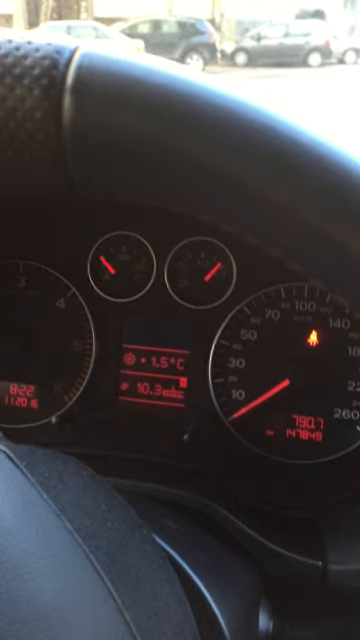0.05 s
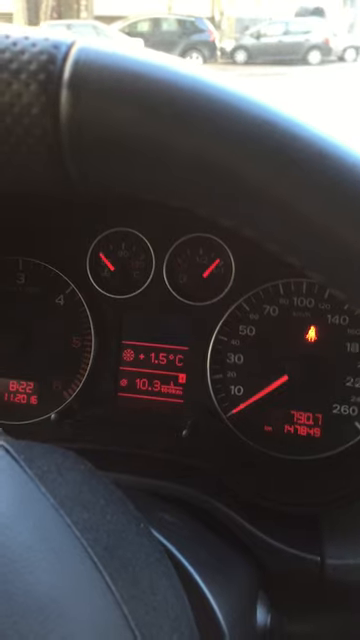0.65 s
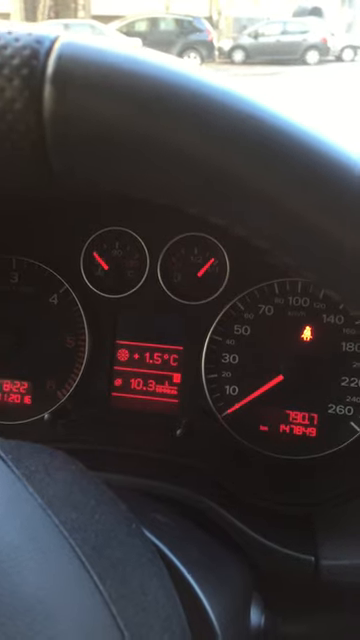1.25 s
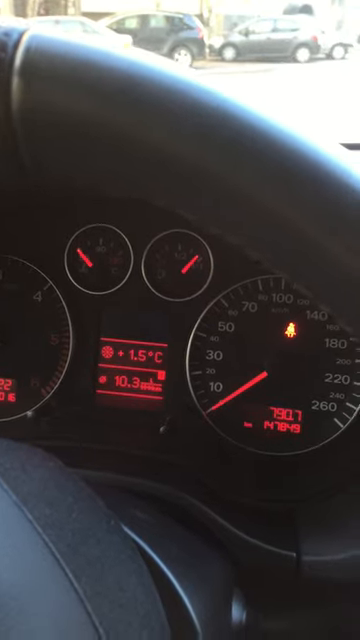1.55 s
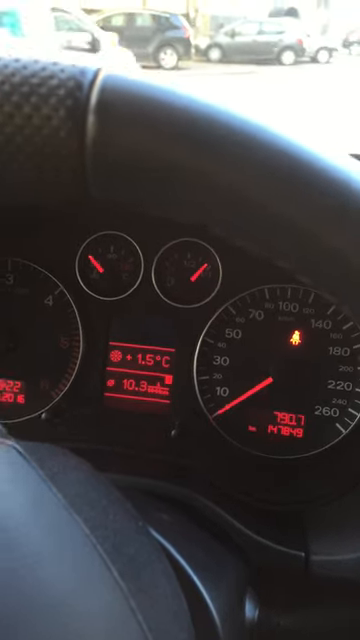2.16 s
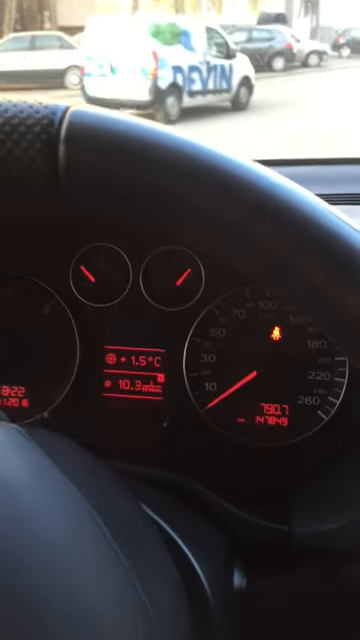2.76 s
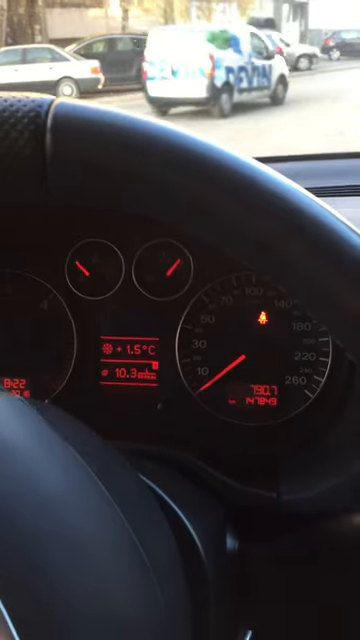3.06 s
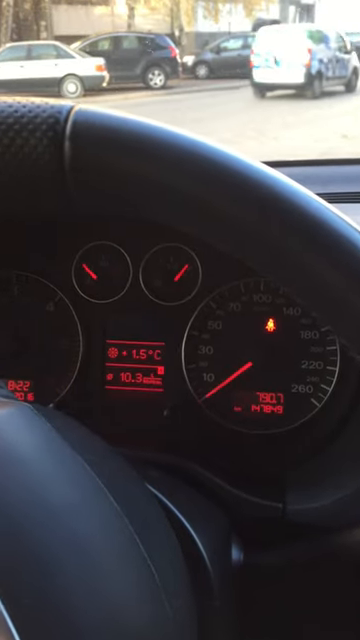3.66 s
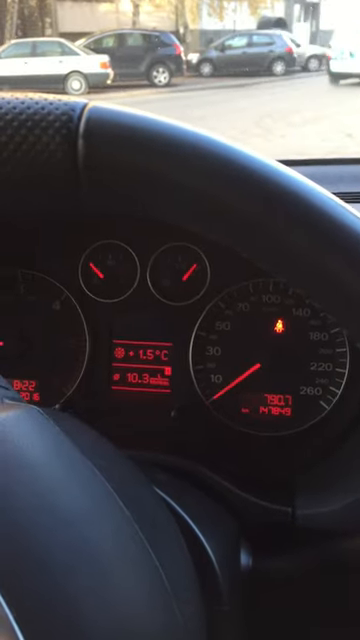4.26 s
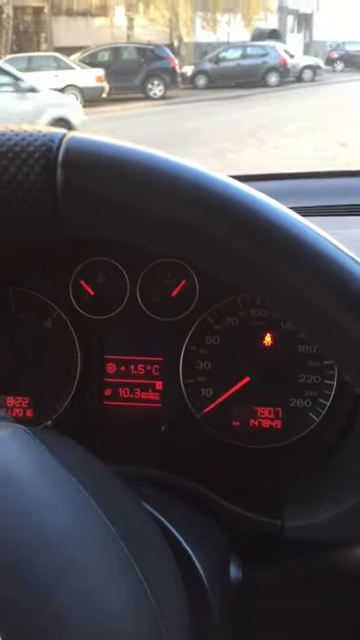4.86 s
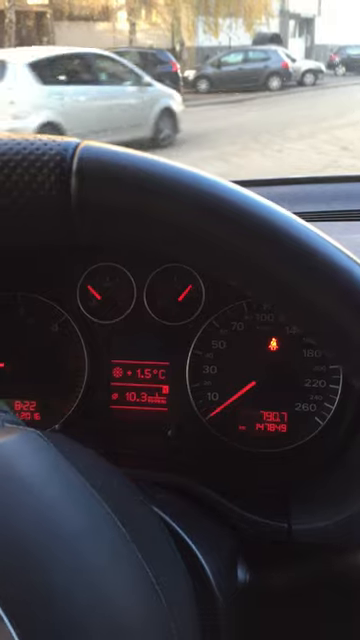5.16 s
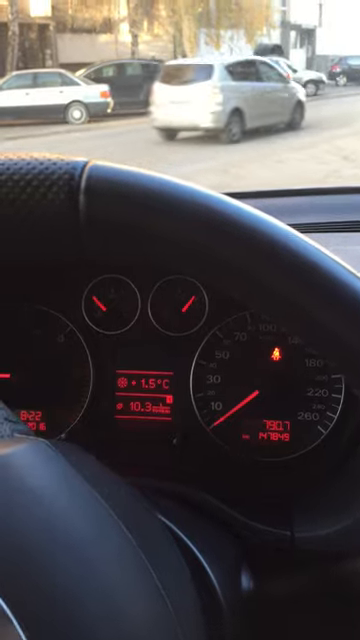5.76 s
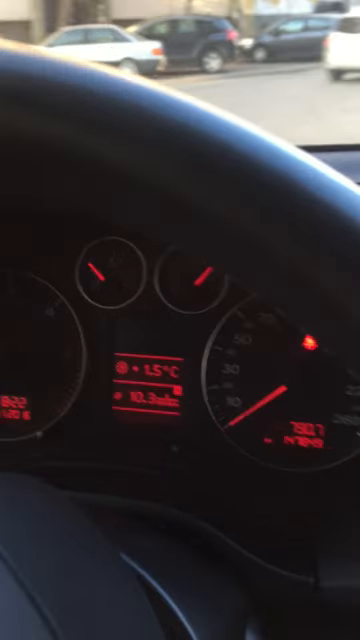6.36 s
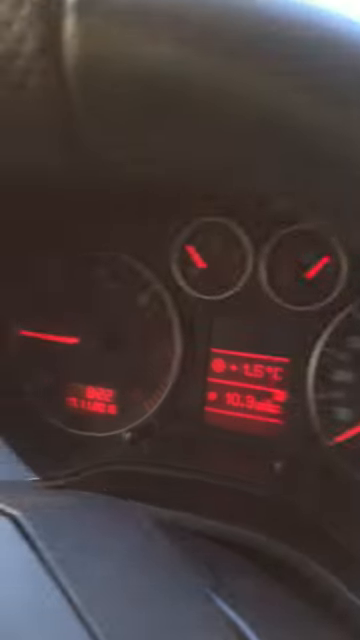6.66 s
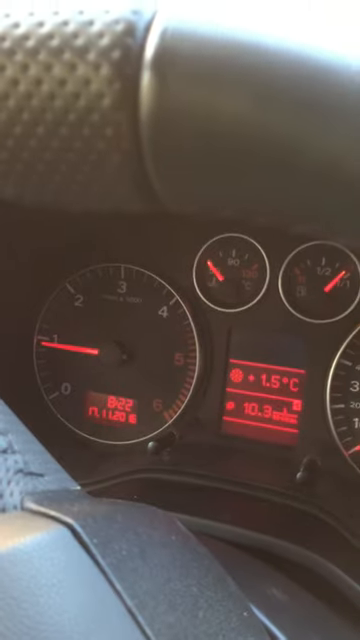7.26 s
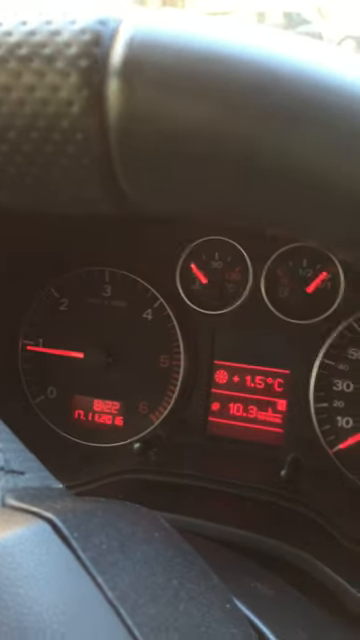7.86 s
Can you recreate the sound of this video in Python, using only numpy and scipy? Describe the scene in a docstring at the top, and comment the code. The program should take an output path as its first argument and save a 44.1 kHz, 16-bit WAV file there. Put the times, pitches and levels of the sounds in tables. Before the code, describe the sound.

A cold car engine is started, heard from the driver's seat with the doors shut. The starter cranks and squeaks for about a second, then the engine fires raggedly and the ignition key clicks back. A short booming rise in revs drops into a steady, rumbling idle. While it runs, clothing rustles faintly, a panel is softly bumped twice and a small motor whirrs briefly behind the dashboard.

```python
"""Cold start from the driver's seat

A cold four-cylinder car engine is started, heard with the doors shut. The starter labours and chirps
against the compression strokes, the engine catches with hard knocks, and the key snaps back.
Firing pulses boom through the cabin as the revs flare and sink to a throbbing idle.
The driver's sleeve rustles and a small servo whirrs behind the dashboard, over a faint hiss."""
import sys
import numpy as np
from scipy import signal
from scipy.fft import rfft, irfft, next_fast_len
from scipy.io import wavfile

SR = 44100
rng = np.random.default_rng(int(sys.argv[2]) if len(sys.argv) > 2 else 0)


def output_pcm(signal):
    """Save a mono or channel-first signal as 16-bit PCM at the path in sys.argv[1].

    Samples are clipped to [-1, 1] before scaling.
    """
    pcm = np.clip(np.atleast_2d(signal).T, -1, 1) * 32767
    wavfile.write(sys.argv[1], SR, np.round(pcm).astype(np.int16))


N = 348831
TIME = np.arange(N) / SR
CATCH_S, KEY_BACK_S = 1.16, 1.49  # the engine catches, the key springs back
CALM_TIME_S = 1.37  # time constant with which the idle steadies


def from_db(db):
    """Amplitude ratio of a level in decibels."""
    return 10 ** (np.asarray(db) / 20)


def rms_one(x):
    """Normalisation to unit power."""
    return x / np.sqrt(np.mean(x ** 2) + 1e-20)


def in_time(rows):
    """Linear interpolation of (time, value) rows at every sample."""
    return np.interp(TIME, *np.transpose(rows))


def gain_at(spectrum, hz):
    """Gain of a spectrum, interpolated on a log-frequency axis."""
    points, db = np.transpose(spectrum)
    return from_db(np.interp(np.log(hz + 0.00092), np.log(points), db))


def butterworth(x, hz, kind, order=2):
    """Maximally flat low-pass or high-pass filtering."""
    return signal.sosfilt(signal.butter(order, hz, kind, fs=SR, output="sos"), x)


def noise(spectrum):
    """Spectrally shaped noise of unit power, falling steeply beyond the spectrum's ends."""
    size = next_fast_len(N)
    hz = np.arange(size // 2 + 1) * SR / size + 1e-3
    ends = np.minimum(1, hz / spectrum[0][0]) ** 2 * np.minimum(1, spectrum[-1][0] / hz) ** 2
    white = rfft(rng.standard_normal(size))
    return rms_one(irfft(white * gain_at(spectrum, hz) * ends, size)[:N])


def drift(rate):
    """Random modulation: straight lines between normal draws, `rate` of them a second."""
    return np.interp(TIME * rate, np.arange(4096), rng.standard_normal(4096))


def ring(force, hz, t60):
    """Damped resonator: a unit impulse starts a decaying sine of height 1."""
    r, w = np.exp(-np.log(1000) / (t60 * SR)), 2 * np.pi * hz / SR
    return signal.lfilter([0, np.sin(w)], [1, -2 * r * np.cos(w), r * r], force + 1e-18)


def resonant_noise(modes):
    """Random excitation of steep-sided resonances, at unit power."""
    out = 0
    for hz, width, db in modes:
        t60 = np.log(1000) / (np.pi * width)
        once = ring(rng.standard_normal(N), hz, t60)
        out += from_db(db) * rms_one(ring(once, hz, t60))
    return rms_one(out)


def blows(rows):
    """Impulse train from rows that begin with time and level."""
    out = np.zeros(N)
    for s, db, *_ in rows:
        out[int(s * SR)] += from_db(db)
    return out


def fade(age, rise, t60):
    """Impact envelope: quick rise, exponential decay."""
    age = np.maximum(age, 0)
    return (1 - np.exp(-age / rise)) * np.exp(-np.log(1000) * age / t60)


def swell(rows, rise, t60):
    """Superposed impact envelopes, one for each blow."""
    decay, soft = np.exp(-np.log(1000) / (t60 * SR)), np.exp(-1 / (rise * SR))
    return signal.lfilter([1 - soft], np.convolve([1, -soft], [1, -decay]), blows(rows) + 1e-18)


def onset(start, rise):
    """Linear ramp from 0 to 1."""
    return np.clip((TIME - start) / rise, 0, 1)


def hold(start, stop, rise, fall):
    """Trapezoidal envelope: rises from start, holds, falls from stop."""
    return onset(start, rise) * (1 - onset(stop, fall))


# Rocking of the engine. Each row: frequency in Hz, relative spectral density in dB.
SHAKE_SPECTRUM = [(26, -29), (34, 6.5), (48, 2), (75, -1.5), (130, -2), (195, -4), (250, -17), (400, -15),
                  (520, -28), (900, -45.5)]
def mount_shake(racing, early_db=-38, idle_db=-44, race_db=4.5, calm_from_s=2.26):
    """Random vibration on the mounts rumbles, more as the starter races, less as the idle steadies."""
    restless = np.exp(-np.maximum(TIME - calm_from_s, 0) / CALM_TIME_S)
    level_db = idle_db + (early_db - idle_db) * restless + race_db * racing
    return from_db(level_db) * noise(SHAKE_SPECTRUM)


# Grinding of the starter gears. Each row: frequency in Hz, relative spectral density in dB.
GEAR_SPECTRUM = [(120, -17.5), (280, 3), (410, 2), (530, -11), (650, -4.5), (780, -13), (1100, -11.5),
                 (1450, -28.5), (1800, -28), (2200, -31), (2750, -32), (3600, -37.5), (7000, -53)]
# Gear resonances. Each row: frequency in Hz, width in Hz, relative level in dB.
GEAR_MODES = [(2683, 130, 7), (2920, 240, 6), (1800, 230, -15)]
# The heaviest compression strokes. Each row: start in seconds, relative level in dB.
STROKES = [(.018, -21.5), (.112, -31), (.232, -28.5), (.31, -28), (.338, -36), (.43, -35), (.575, -30.5),
           (.665, -24.5), (.872, -25), (.95, -33), (1.03, -27), (1.165, -23)]
def starter(racing, base_db=-53, growth_db_per_s=2, race_db=7.5, ring_db=-28):
    """Meshing gears grind and ring; each compression is an impulse that thumps mounts and panels."""
    strokes = butterworth(blows(STROKES), 200, "low")
    thumps = ring(strokes, hz=48, t60=0.35) + from_db(-4) * ring(strokes, hz=105, t60=0.14)
    level_db = base_db + growth_db_per_s * TIME * (TIME < KEY_BACK_S) + race_db * racing
    grinding = from_db(level_db + 5 * drift(35.49)) * noise(GEAR_SPECTRUM)
    flicker_db = 6 * np.tanh(drift(24.64))
    load = 1 + 25 * swell(STROKES, rise=0.0088, t60=0.044)
    ringing = from_db(level_db + ring_db + flicker_db) * load * resonant_noise(GEAR_MODES)
    turning = 1 - onset(1.86, 0.32)  # the pinion coasts to rest
    return thumps + turning * (grinding + ringing)


# Background hiss. Each row: frequency in Hz, relative spectral density in dB.
HISS_SPECTRUM = [(100, 25.5), (1000, 9.5), (3000, 6), (5000, 0.5), (6200, 1.5), (8000, -2.5), (9300, 0.5),
                 (10400, -7), (12000, -2.5), (16000, -6.5)]
def hiss(level_db=-71):
    """Stationary broadband noise forms a faint floor."""
    return from_db(level_db) * noise(HISS_SPECTRUM)


# Chirps of the starter drive. Each row: centre in seconds, level in dB, half length in seconds.
CHIRPS = [(0.021, -55.5, 0.011), (0.052, -54, .009), (0.124, -48, 0.011), (0.215, -50.5, 0.013),
          (.242, -55, .014), (0.364, -56, 0.009), (0.44, -49, 0.011), (0.526, -48.5, 0.012),
          (0.558, -62, .012), (0.731, -55.5, .007)]
# Their rasp. Each row: frequency in Hz, relative spectral density in dB.
RASP_SPECTRUM = [(300, -4), (650, 6.5), (800, -5), (1100, 9), (1350, -34), (1800, -7), (2100, -16),
                 (2700, -14), (4000, -33)]
def chirps(pitch_hz=1140, scatter=0.0135, roughness=0.038, sag=0.027, rasp_db=-3):
    """The loaded starter drive squeals: sagging tones, roughened by random frequency modulation."""
    out = np.zeros(N)
    waver = roughness * drift(700)
    rasp = from_db(rasp_db) * noise(RASP_SPECTRUM)
    pitches = pitch_hz * (1 + scatter * rng.standard_normal(len(CHIRPS)))
    for (centre, db, half), hz in zip(CHIRPS, pitches):
        near = np.abs(TIME - centre) < 4 * half
        offset = (TIME[near] - centre) / half
        cycles = np.cumsum(hz * (1 - sag * offset + waver[near])) / SR
        tone = np.sqrt(2) * np.sin(2 * np.pi * cycles)
        envelope = np.exp(-np.abs(offset) ** 4.2 / 2)
        out[near] += from_db(db) * envelope * (tone + rasp[near])
    return out


# Stray and ragged firings. Each row: start in seconds, relative level in dB.
KNOCKS = [(.785, -50), (1.04, -56), (1.173, -50), (1.207, -47.5), (1.297, -43), (1.325, -43), (1.36, -54),
          (1.395, -41), (1.578, -58), (2.118, -50)]
# The hammered block. Each row: frequency in Hz, relative spectral density in dB.
KNOCK_SPECTRUM = [(150, 3), (400, 19), (550, 5), (900, 6), (1400, 1), (1760, 8), (2100, -21), (2800, -8),
                  (3400, -20), (4200, -34), (8000, -38)]
def knocks(gain_db=4):
    """Impact excitation: ragged firings hammer the block into short bursts of noise."""
    return from_db(gain_db) * swell(KNOCKS, rise=0.00058, t60=0.13) * noise(KNOCK_SPECTRUM)


def orders(firings, rate, response, wobble_db, count, lead_hz=40, trail_hz=260):
    """Harmonic series on the firing rate, weighted by a response, each order wavering in level."""
    out = 0
    for k in range(1, count + 1):
        hz = k * rate
        # dispersion in the cabin: deep tones run ahead, higher ones trail
        phase = (lead_hz / hz) ** 2 - np.minimum(hz / trail_hz, 1) ** 2
        gain = gain_at(response, hz) * from_db(wobble_db * drift(7))
        out += gain * np.cos(2 * np.pi * k * firings + phase)
    return rms_one(out)


# Cabin response to the firing pulses. Each row: frequency in Hz, relative gain in dB.
BOOM_RESPONSE = [(30, -10), (44, 7.5), (52, 2.5), (61, 0.5), (92, 2.5), (101, 4.5), (122, -1), (152, -8),
                 (183, -6), (200, -3.5), (213, -29), (260, -40), (320, -52.5)]
def firing_boom(firings, rate):
    """Periodic pressure pulses drive the cabin air at the lowest engine orders."""
    boom = orders(firings - 0.0017, rate, BOOM_RESPONSE, wobble_db=0.9, count=9)
    return onset(CATCH_S, rise=0.05) * boom


# Clatter of the block. Each row: frequency in Hz, relative spectral density in dB.
CLATTER_SPECTRUM = [(90, -25), (150, -5), (230, 12), (272, 7), (330, 10), (430, 7), (520, -4), (590, -2),
                    (660, 3.5), (760, -7.5), (900, -4.5), (1080, -16.5), (1270, -18), (1530, -21),
                    (1720, -24), (1950, -21.5), (2200, -34.5), (2440, -20), (2600, -28.5), (3100, -31.5),
                    (3800, -35.5), (5500, -49.5), (15000, -57)]
# Tappet resonances. Each row: frequency in Hz, width in Hz, relative level in dB.
TAPPET_MODES = [(1710, 240, 0), (1250, 200, -2), (2350, 330, -9), (826, 350, 2)]
def block_clatter(firings, floor=0.64, uneven_db=5, cylinder_db=(1.5, -1.5, -1, 1), tappet_db=-7):
    """Amplitude-modulated noise: four cylinders knock unequally; a loose tappet ticks once a cycle."""
    # lags, ages, rises and decays are counted in firings
    index, age = np.divmod(firings - 0.11 + 1, 1)
    index, cylinders = index.astype(int), len(cylinder_db)
    strength = from_db(uneven_db * rng.uniform(-1, 1, N)[index])
    force = strength * from_db(cylinder_db)[index % cylinders]
    clatter = rms_one(noise(CLATTER_SPECTRUM) * (floor + force * fade(age, rise=0.14, t60=5.6)))
    tick = fade((firings - 3.115) % cylinders, rise=0.11, t60=1.84)
    tappet = from_db(tappet_db + 3 * drift(8)) * strength * tick * resonant_noise(TAPPET_MODES)
    return onset(CATCH_S, rise=0.17) * (clatter + tappet)


# Cabin response to the block's vibration. Each row: frequency in Hz, relative gain in dB.
DRONE_RESPONSE = [(140, -7), (185, 9), (215, 3), (270, -40.5), (305, -7), (338, 7.5), (366, -5.5),
                  (400, -1), (430, -2), (500, -52), (570, -46.5), (630, -17), (730, -13.5), (800, -31),
                  (950, -31)]
def block_drone(firings, rate, ragged_jitter=0.031, steady_jitter=0.00092):
    """Forced vibration of the block, with phase jitter from ragged firing until the idle settles."""
    unsettled = np.exp(-np.maximum(TIME - CATCH_S, 0) / CALM_TIME_S)
    jitter = (steady_jitter + ragged_jitter * unsettled) * drift(30)
    drone = orders(firings - 0.46 + jitter, rate, DRONE_RESPONSE, wobble_db=1.0, count=31)
    return onset(CATCH_S, rise=0.58) * drone


# Engine speed: it flares, sinks and hunts. Each row: time in seconds, firings per second.
FIRING_RATE = [(1.1, 35.162), (1.42, 43.896), (1.55, 52.132), (1.85, 42.213), (2.05, 31.078),
               (2.35, 31.885), (2.65, 30.896), (2.9, 31.719), (3.4, 30.439), (3.7, 31.095), (4.8, 30.704),
               (6.1, 30.62), (6.6, 30.232), (7.2, 30.451)]
# How hard the engine fires. Each row: time in seconds, boom level in dB.
EFFORT = [(1.22, -30.5), (1.33, -38), (1.47, -25.5), (1.55, -29), (1.64, -27.5), (1.76, -31), (1.86, -40),
          (2.1, -38.5), (4.5, -36.5), (7.9, -34)]
def engine(idle_effort_db=-38):
    """One periodic excitation locks boom, drone and clatter together; each follows effort in level."""
    rate, effort_db = in_time(FIRING_RATE), in_time(EFFORT)
    firings = np.cumsum(rate) / SR
    swing_db = effort_db - idle_effort_db
    boom = from_db(effort_db) * firing_boom(firings, rate)
    drone = from_db(-45.5 + 0.32 * swing_db) * block_drone(firings, rate)
    clatter = from_db(-48 + 0.033 * swing_db) * block_clatter(firings)
    return boom + drone + clatter


# Key and switch clicks. Each row: start in seconds, level in dB, low cutoff in Hz, T60 in seconds.
CLICKS = [(1.287, -44, 7460, 0.035), (1.416, -31, 1730, 0.015), (1.435, -53, 5500, 0.089),
          (1.4548, -41, 5500, 0.011), (1.467, -44, 3000, 0.056), (1.4737, -22, 1580, 0.032),
          (1.485, -48, 900, 0.071), (1.5133, -43.5, 3960, 0.023), (1.524, -45.5, 2430, 0.092),
          (3.4577, -54.5, 9800, .043), (3.8617, -60, 4000, 0.043), (6.222, -63, 4000, .061)]
# Their crack. Each row: frequency in Hz, relative spectral density in dB.
CLICK_SPECTRUM = [(300, 18), (1000, 12), (2400, 1), (3300, -1), (4500, -10), (6000, -7), (8000, -14.5),
                  (11000, -17), (14000, -22.5), (16000, -22)]
# Key barrel and steering column. Each row: frequency in Hz, relative level in dB, T60 in seconds.
COLUMN_MODES = [(1150, -9, 0.045), (1585, -2, 0.055), (1900, -7, 0.065), (2040, -10, 0.086),
                (2420, 3, 0.034), (3010, 0, 0.04), (4270, 3.5, 0.022), (6000, 1, 0.026)]
def clicks(rise_s=0.0006, ring_db=-14):
    """Key and switch impacts give broadband cracks and excite the modes of the steering column."""
    out, crack = np.zeros(N), noise(CLICK_SPECTRUM)
    for start, db, low_hz, t60 in CLICKS:
        part = slice(int(start * SR), int(start * SR) + SR // 4)
        burst = rms_one(butterworth(crack[part], low_hz, "high"))
        out[part] += from_db(db) * burst * fade(TIME[part] - start, rise_s, t60)
    hits = blows(CLICKS)
    for k, (hz, db, t60) in enumerate(COLUMN_MODES):
        out += (-1) ** k * from_db(ring_db + db) * ring(hits, hz, t60)
    return out


# Strokes of the sleeve. Each row: centre in seconds, level in dB, half length in seconds.
SLIDES = [(2.11, -62.5, .055), (2.39, -60, 0.15), (2.858, -71, 0.29), (3.743, -66.5, 0.058),
          (6.368, -68.5, 0.13), (6.58, -69.5, 0.14)]
# Rubbing cloth. Each row: frequency in Hz, relative spectral density in dB.
SLEEVE_SPECTRUM = [(500, -40), (1650, -2), (2450, 1), (3200, 2), (4800, 1.5), (6200, -1), (8000, -4.5),
                   (10500, -6), (13500, -4.5), (16000, -7.5)]
# Resonances of the trim. Each row: frequency in Hz, width in Hz, relative level in dB.
TRIM_MODES = [(1697, 510, 8), (2300, 390, 6.5), (3730, 500, -7), (4930, 140, -1), (5680, 200, -4.5)]
# Light taps on the trim. Each row: start in seconds, level in dB.
TAPS = [(2.79, -52), (3.457, -49.5), (3.765, -58), (6.55, -52)]
# Soft bumps on a panel. Each row: start in seconds, level in dB.
BUMPS = [(2.99, -46), (3.775, -26), (4.47, -31)]
def driver(grain_db=1.5, trim_db=-4):
    """Cloth friction and a hand's taps excite the trim; a limb bumps a panel into damped vibration."""
    slide_power = sum(from_db(db) ** 2 * np.exp(-((TIME - s) / half) ** 2) for s, db, half in SLIDES)
    trim = resonant_noise(TRIM_MODES)
    rubbing = rms_one(noise(SLEEVE_SPECTRUM) + from_db(trim_db) * trim)
    rustle = np.sqrt(slide_power) * from_db(grain_db * drift(300)) * rubbing
    taps = swell(TAPS, rise=0.0034, t60=0.038) * trim
    return rustle + taps + ring(blows(BUMPS), hz=132, t60=0.23)


# Gear train of the flap servo. Each row: frequency in Hz, width in Hz, relative level in dB.
SERVO_MODES = [(2800, 170, -3), (3220, 200, 1), (3920, 170, 0), (4180, 140, -8), (4450, 190, 0.5),
               (4730, 110, -5), (5600, 1200, -5)]
def flap_servo(start_s=4.33, stop_s=5.3, start_db=-70, sag_db_per_s=9):
    """Randomly excited gear resonances whirr through one run, growing quieter as it goes."""
    running = hold(start_s, stop_s, rise=0.097, fall=0.3)
    level_db = start_db - sag_db_per_s * (TIME - start_s) + 2.5 * drift(40)
    return running * from_db(level_db) * resonant_noise(SERVO_MODES)


# Reflections from windscreen, side window and roof. Each row: delay in seconds, gain as a ratio.
REFLECTIONS = [(.0019, 0.16), (.0043, -0.11), (.0071, 0.16), (0.0113, .17), (0.0145, -.13)]
def cabin(x, above_hz=1200):
    """Comb filtering: early reflections of the treble interfere with the direct sound."""
    treble = butterworth(x, above_hz, "high")
    return x + sum(gain * np.interp(TIME - delay, TIME, treble, left=0) for delay, gain in REFLECTIONS)


def scene():
    """Superposition of all sources at the driver's seat."""
    racing = hold(CATCH_S, KEY_BACK_S, rise=0.15, fall=0.12)  # the engine drags the starter along
    machinery = engine() + mount_shake(racing) + starter(racing) + chirps() + knocks()
    interior = hiss() + clicks() + driver() + flap_servo()
    return cabin(machinery + interior)[None]


def record(dry, low_hz=16, high_hz=15700):
    """Band limiting: the microphone loses the deepest bass, and the top is cut steeply."""
    dry = butterworth(dry, low_hz, "high", order=1)
    return signal.sosfilt(signal.ellip(10, .1, 90, high_hz, fs=SR, output="sos"), dry)


dry = scene()
out = record(dry)
output_pcm(out)
```